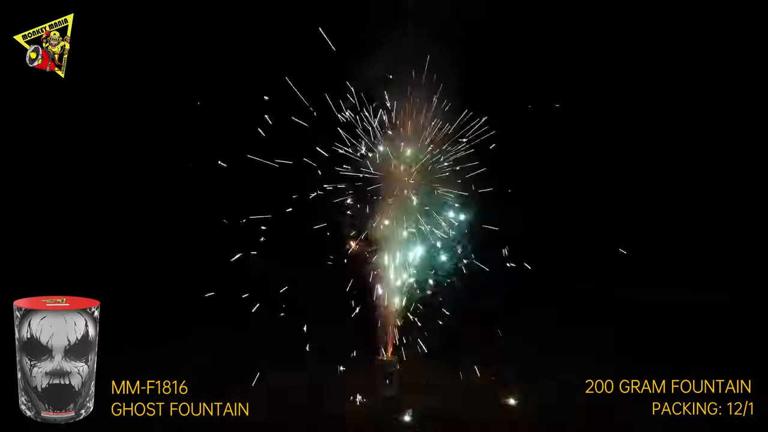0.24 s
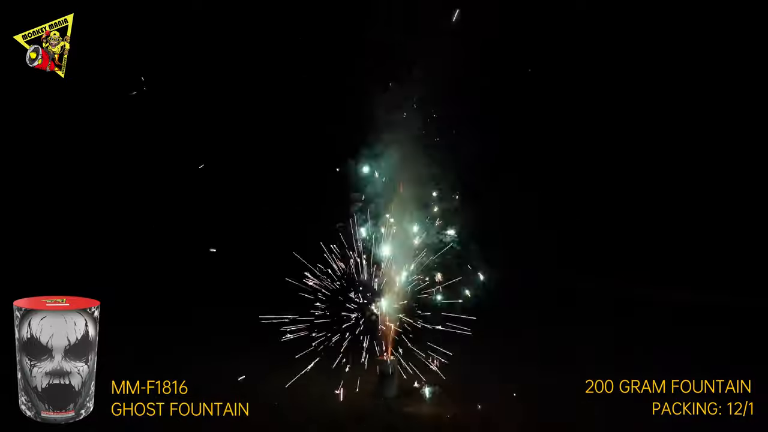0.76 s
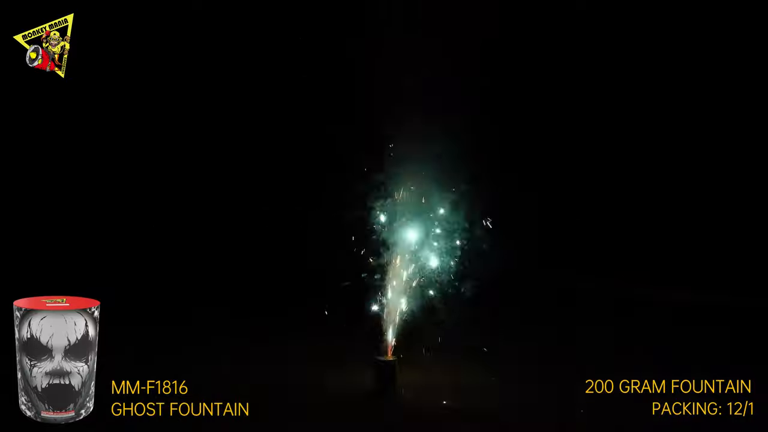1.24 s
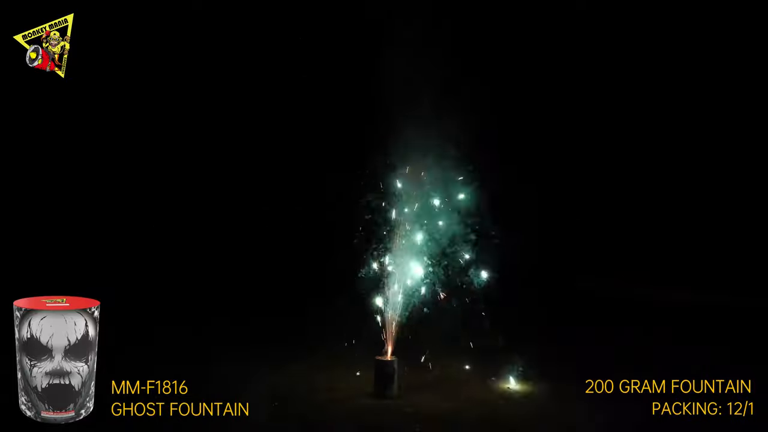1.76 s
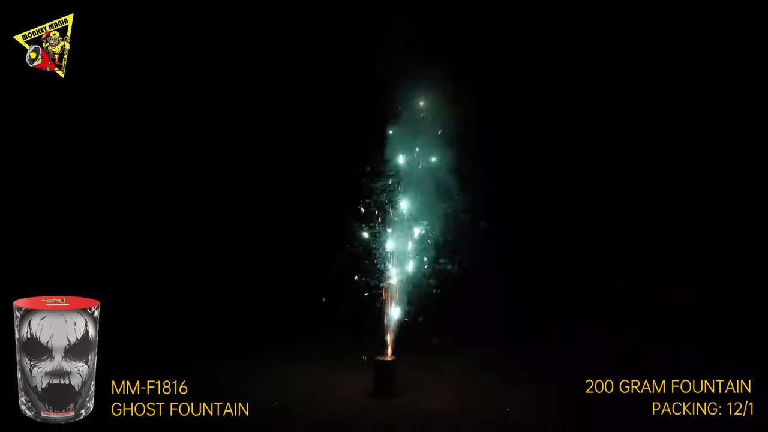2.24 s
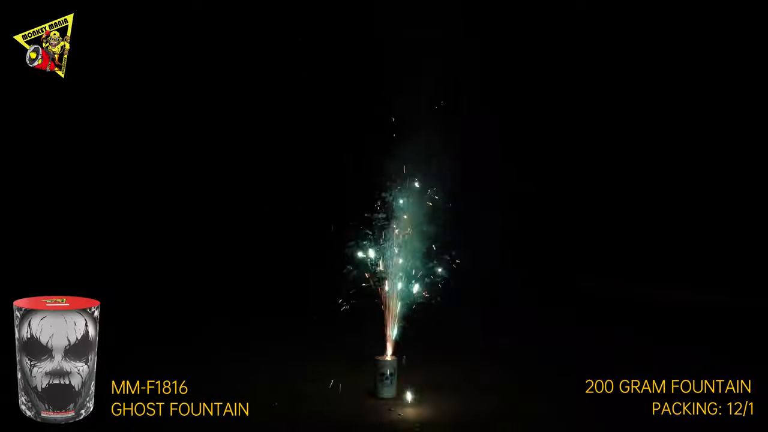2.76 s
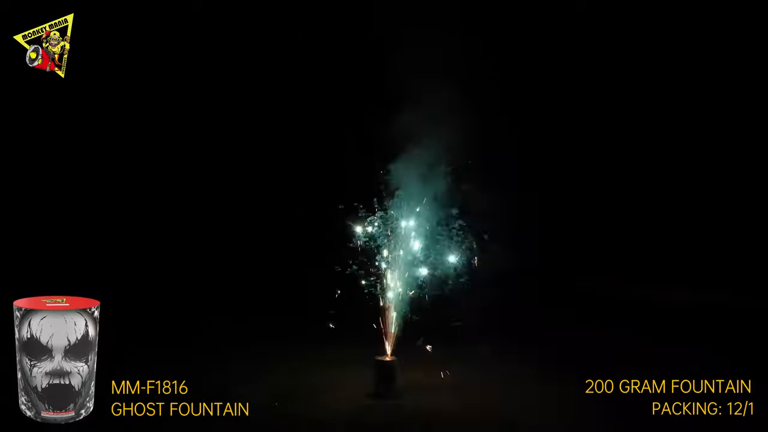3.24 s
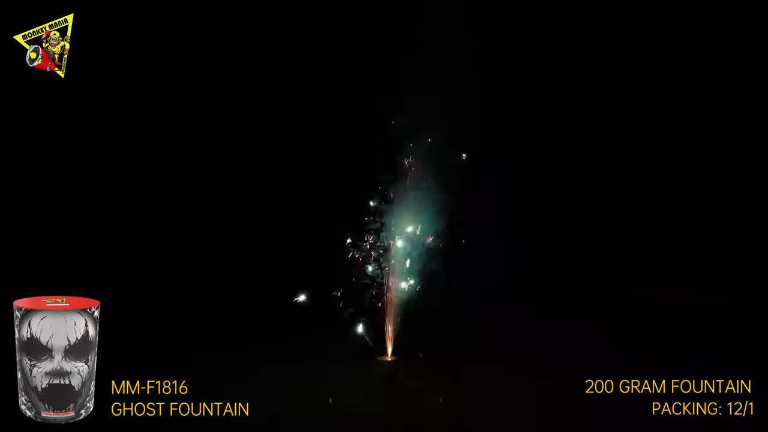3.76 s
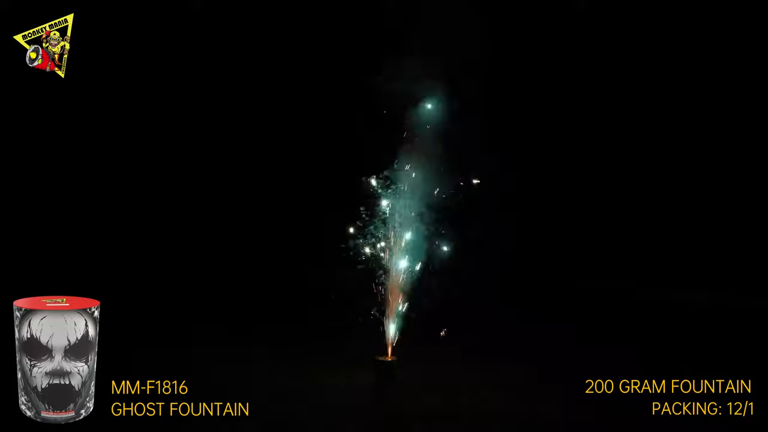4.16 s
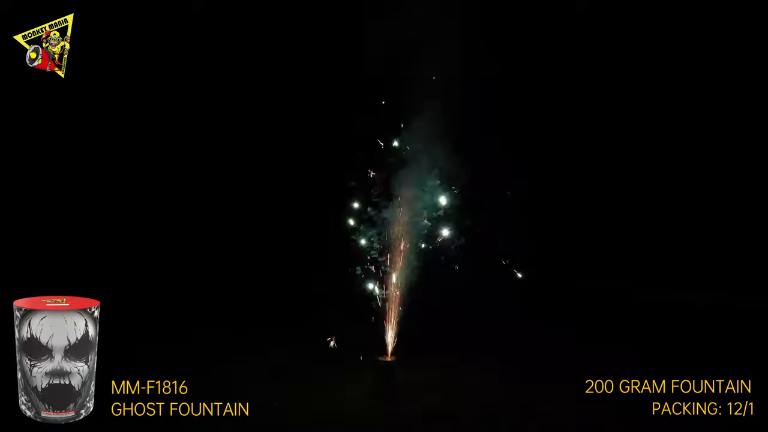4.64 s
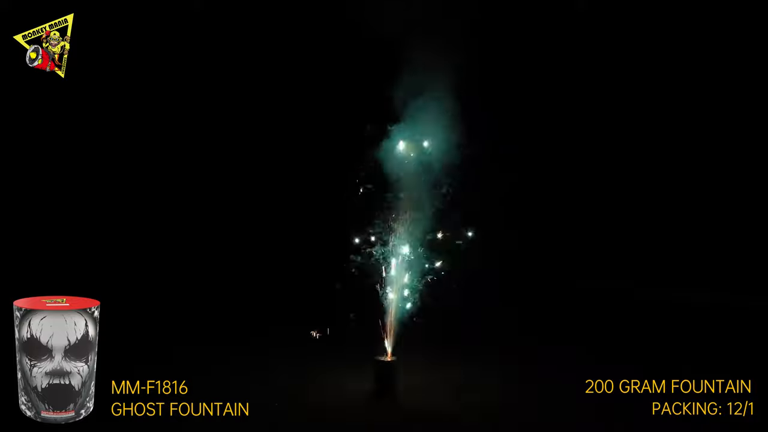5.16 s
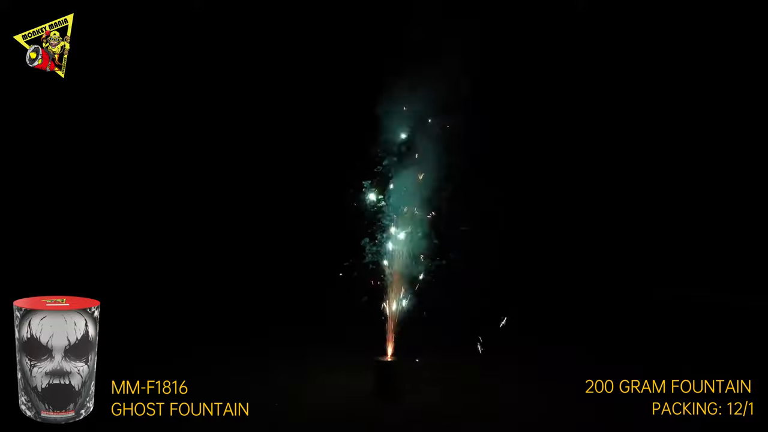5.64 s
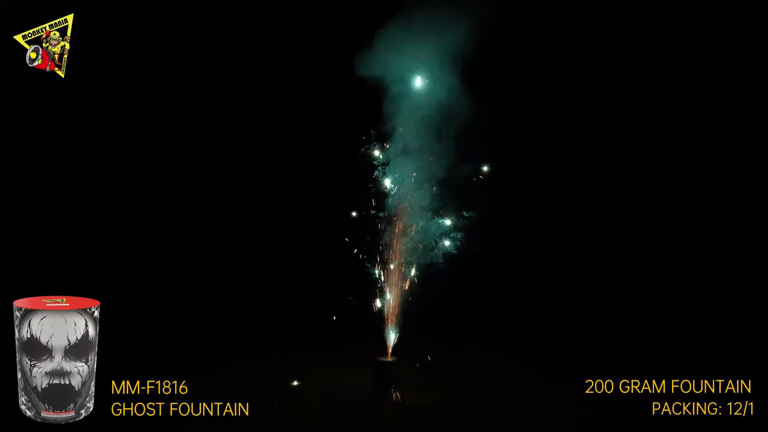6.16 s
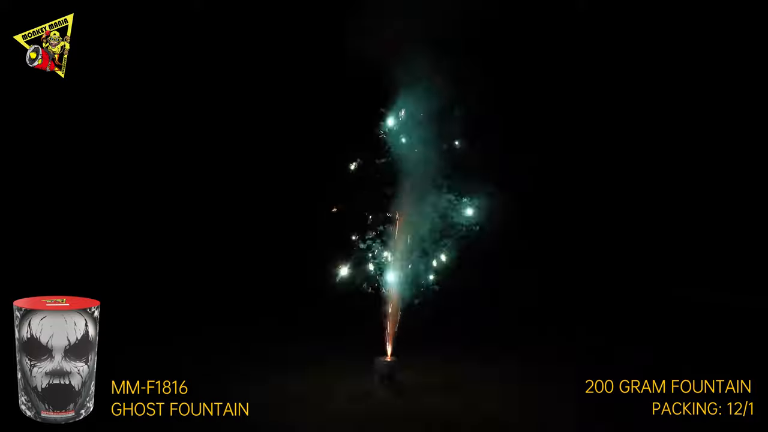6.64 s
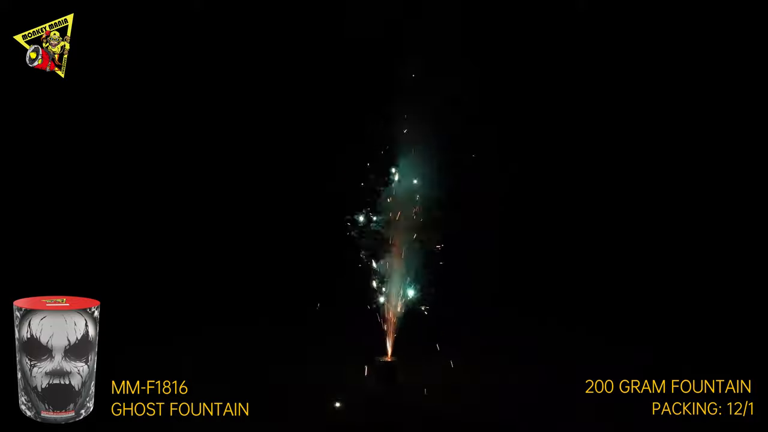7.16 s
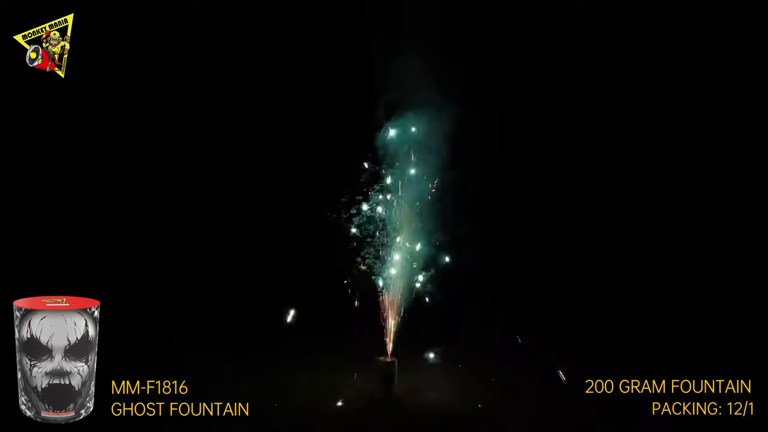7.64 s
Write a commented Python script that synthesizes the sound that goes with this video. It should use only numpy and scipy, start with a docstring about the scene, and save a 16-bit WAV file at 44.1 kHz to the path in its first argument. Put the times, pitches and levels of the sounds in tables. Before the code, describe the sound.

Rapid crackling and a few small pops from a ground firework give way to a swelling, rushing jet of sparks.

```python
"""Firework fountain at night

A fountain burns on open ground a few metres away, over the soft hiss of its flame. Crackling stars
burst in sharp snaps, each doubled by its bounce off the ground and trailed by a faint outdoor tail.
The nozzle pops five times, ringing its cardboard tube; then the next charge builds into a loud,
fluttering jet of turbulent gas and sparks."""
import sys
import numpy as np
from scipy import signal
from scipy.fft import rfft, irfft
from scipy.io import wavfile
from scipy.ndimage import uniform_filter1d, minimum_filter1d

SR = 44100
rng = np.random.default_rng(int(sys.argv[2]) if len(sys.argv) > 2 else 0)


def inscribe(sig):
    """Save sig as 16-bit PCM at rate SR to the path in sys.argv[1].

    A 1-D sig is mono; a 2-D sig holds one channel per row.
    Samples are clipped to [-1, 1] before scaling.
    """
    pcm = np.round(np.clip(np.atleast_2d(sig).T, -1, 1) * 32767)
    wavfile.write(sys.argv[1], SR, pcm.astype(np.int16))


N = 348390
T = np.arange(N) / SR
HZ = np.fft.rfftfreq(N, 1 / SR)

# Length of the outdoor tail. Each row: frequency in Hz, seconds to fade by 60 dB.
TAIL_DECAY = [(200, 1.5), (1000, 0.43), (3000, .6), (8000, 0.7), (15000, 0.5)]
# Tone of the outdoor tail. Each row: frequency in Hz, relative level in dB.
TAIL_EQ = [(100, 0), (700, -0.5), (2000, 0.5), (5000, 0.5), (10000, -8), (15000, 0)]
# Tone of the flame's quiet hiss. Each row: frequency in Hz, relative level in dB.
SIMMER_EQ = [(18, -76), (30, -46), (256, -7), (389, -14), (852, -7), (996, -12), (1590, 1), (2420, -3),
             (2830, -9), (11600, -8), (14300, -25), (15500, -40)]
# Pops inside the tube. Each row: start in seconds, relative level in dB.
POP_CUES = [(.7098, -17), (.758, -12), (0.913, -14), (.954, -9), (1.0085, -8.5)]
# The tube's ring. Each row: frequency in Hz, relative level in dB, seconds to fade by 60 dB.
TUBE_MODES = [(260, -26.5, 0.016), (1740, -8.5, 0.0061), (2250, -6.5, 0.0095), (3950, -11.5, 0.0065),
              (5900, -9, 0.0043), (8550, -13, 0.0034)]
# Bursting stars. Each row: start in seconds, relative level in dB, ground bounce delay in seconds.
STAR_CUES = [(0.0014, -3.5, 0.002), (0.0089, -12, 0.0018), (0.0146, 1, 0.0022), (0.0292, 2.5, 0.0028),
             (0.0446, 0, 0.0029), (0.0522, 0.5, 0.0028), (0.0815, 2.5, 0.0027), (0.0984, 0, 0.0024),
             (0.0998, -1, 0.0022), (0.1053, -3, 0.0025), (0.1126, 1.5, 0.002), (0.1209, 0, 0.0018),
             (0.1289, -1.0, 0.0024), (0.132, -0.5, 0.0027), (0.1377, -6, 0.002), (0.1406, 2.5, 0.0031),
             (0.1446, 2, 0.00226), (0.189, -13.0, 0.0015), (0.2056, 2, 0.0029), (0.2085, -4, 0.0025),
             (0.2106, 4, 0.0024), (0.2379, -6, 0.0014), (0.2475, 2, 0.0031), (0.2513, -1.0, 0.0025),
             (0.2668, 0, 0.0026), (0.3146, -5.5, 0.0016), (0.3187, 4, 0.0029), (0.4014, 4.5, 0.0023),
             (0.4176, 2, 0.0015), (0.45, 3, 0.0018), (0.4531, 4.5, 0.0025), (0.462, 0, 0.0013),
             (0.4663, -5, 0.0012), (0.484, -2, 0.0021), (0.4862, 2.5, 0.0018), (0.4962, 1.5, 0.0016),
             (0.5072, -8.0, 0.0015), (0.5093, -3, 0.0013), (0.5168, 2, 0.0014), (0.552, 1.5, 0.0031),
             (0.5852, 2, 0.0027), (0.5893, 2.5, 0.0013), (0.593, 1.5, 0.0019), (0.5937, 1.5, 0.0022),
             (0.6287, 1.5, 0.0022), (0.6302, 3.5, 0.0019), (0.6456, 0, 0.00063), (0.663, 1.5, 0.0011),
             (0.6636, 2, 0.00099), (0.7821, 4, 0.0011), (0.7858, -1, 0.00095)]
# Tone of a star's snap. Each row: frequency in Hz, relative level in dB.
SNAP_EQ = [(30, -40), (70, -34), (160, -13), (300, -9.5), (650, -3), (1400, 2), (2500, 0.5), (3800, -1),
           (5200, -1), (7200, -2.5), (9500, 0.5), (11500, -3.5), (13500, -13), (16000, -23)]
# Broad tone of the jet. Each row: frequency in Hz, relative level in dB.
JET_EQ = [(30, -27), (62, -41), (100, -20.5), (170, -3.5), (260, 0), (450, -5), (1100, -9), (3000, -12.5),
          (7000, -14), (10000, -9.5), (12500, -15.5), (14000, -20.5), (15600, -28.5)]
# Peaks and notches from tube and ground path. Each row: centre in Hz, width in Hz, gain in dB.
JET_RESONANCES = [(484, 61, -5), (636, 39, 0.6), (822, 23, -5.5), (1305, 81, 5.5), (1585, 163, 11.5),
                  (2113, 227, 14), (2537, 121, 7), (2887, 110, -4), (3510, 210, 7), (3928, 134, 3),
                  (4420, 69, 6), (4700, 44, 3), (5700, 234, 6.5), (6006, 113, 4.5), (6750, 130, 1.5),
                  (7930, 200, 2.5), (8600, 60, 0), (8880, 120, 3), (9270, 60, -1.5), (9900, 220, 1),
                  (12100, 180, 1), (13000, 160, 0.5)]
# Full thrust, swelling and sagging with the uneven burn. Each row: time in seconds, level in dB.
THRUST_FADER = [(2.5, -13.5), (2.98, -15.3), (3.36, -14), (3.42, -18.5), (3.8, -13.5), (4.34, -15.1),
                (4.58, -13.5), (5.02, -15), (5.28, -14), (5.38, -17.5), (5.96, -13), (6.14, -16.5),
                (6.36, -13.3), (6.5, -17.5), (6.6, -15), (6.92, -14.5), (6.96, -17.5), (7.02, -15),
                (7.52, -14), (7.88, -16)]
# The jet's low end. Each row: time in seconds, level against the thrust in dB.
RUMBLE_FADER = [(1.65, -13), (2.08, -9), (2.55, -11.5), (3.1, -8.5), (4.2, -12), (5.4, -9.5), (6.55, -11.5),
                (7.05, -8), (7.9, -11)]
# Bright spits of sparks from the nozzle. Each row: peak time in seconds, lift of the fizz in dB.
SPARK_SPITS = [(2.199, 5.5), (2.56, 2), (3.355, 2), (4.028, 3), (4.642, 2.5), (5.29, 2.5), (6.002, 2.5),
               (6.61, 3)]
# Low puffs of gas. Each row: peak time in seconds, lift of the rumble in dB.
GAS_PUFFS = [(1.304, 5.5), (2.08, 5), (3.063, 4.5), (3.75, 2.5), (4.665, 5), (6.94, 3.5)]
# Balance of jet and hiss at the microphone ports. Each row: frequency in Hz, left minus right in dB.
BURN_PAN = [(120, 0.0), (260, 1), (480, -2.4), (720, -1.5), (1100, -1.5), (1800, -0.4), (2900, 0.5),
            (4000, 0.1)]
# Stereo scatter of jet and hiss. Each row: frequency in Hz, relative side level in dB.
BURN_WIDTH = [(120, -70), (260, -46), (480, -21), (720, -21), (1100, -26), (1800, -19.5), (2900, -39),
              (4000, -35), (8000, -31), (13000, -52)]


def gain_of(db):
    """Decibels to amplitude."""
    return 10 ** (np.asarray(db) / 20)


def unit_rms(x):
    """Scales to rms 1."""
    return x / np.sqrt(np.mean(x ** 2) + 1e-20)


def curve_at(points, hz):
    """Reads a table on a log-frequency axis."""
    f, value = np.transpose(points)
    return np.interp(np.log(hz + 1), np.log(f + 1), value)


def add(mix, start_s, sound):
    """Drops a sound into the mix."""
    part = mix[max(round(start_s * SR), 0):][:len(sound)]
    part += sound[:len(part)]


def tightest_click(db):
    """The shortest click that has the given dB spectrum, with energy 1."""
    log_gain = np.log(gain_of(np.r_[db, db[-2:0:-1]]))
    click = np.fft.ifft(np.exp(np.conj(signal.hilbert(log_gain)))).real
    return click / np.linalg.norm(click)


def flutter(slow_hz, fast_hz):
    """Random wavering between two rates, rms 1."""
    shape = HZ / np.hypot(HZ, slow_hz) / (1 + (HZ / fast_hz) ** 2)
    return unit_rms(irfft(rfft(rng.standard_normal(N)) * shape, N))


def swells(cues, width_s):
    """A brief bell-shaped lift in dB at each cue."""
    return sum(db * np.exp(-.5 * ((T - peak_s) / width_s) ** 2) for peak_s, db in cues)


def scattered_spectrum(x, decay_s):
    """The spectrum of a sound smeared by a short random scatter."""
    scatter = rng.standard_normal(N) * T * np.exp(-T / decay_s)
    return rfft(x) * rfft(scatter / np.linalg.norm(scatter))


def outdoor_tail(x, echoes_per_s=4000, near_db=3, near_s=0.016,
                 slap_db=3, slap_s=0.067, slap_width_s=0.0027):
    """Scattered echoes: a quick cluster from nearby, a soft slap from farther off, a fading wash."""
    echoes = rng.standard_normal(SR) * (rng.random(SR) < echoes_per_s / SR)
    hz, t, wash = signal.stft(echoes, SR, nperseg=256)
    fade_db = 60 * t / curve_at(TAIL_DECAY, hz)[:, None]
    wash = wash * gain_of(curve_at(TAIL_EQ, hz)[:, None] - fade_db)
    near = gain_of(near_db) * np.exp(-t / near_s)
    slap = gain_of(slap_db) * np.exp(-((t - slap_s) / slap_width_s) ** 2)
    tail = signal.istft(wash * (1 + near + slap), SR, nperseg=256)[1]
    return signal.fftconvolve(x, tail / np.linalg.norm(tail))[:N]


def flame_simmer(level_db=-55, flutter_db=2.5):
    """The flame's soft, wavering hiss, a bed under everything."""
    hiss = irfft(rfft(rng.standard_normal(N)) * gain_of(curve_at(SIMMER_EQ, HZ)), N)
    return unit_rms(hiss) * gain_of(level_db + flutter_db * flutter(5, 40))


def nozzle_pops(tick_db=-11, band_hz=(140, 10000), echo_s=0.0072, echo_db=-17):
    """A small blast in the nozzle rings the cardboard tube's air column; a weak echo follows."""
    t, out = np.arange(2048) / SR, np.zeros(N)
    # neighbouring modes swing in opposite directions at the mouth
    ring = sum((-1) ** k * gain_of(db - 60 * t / t60) * np.cos(2 * np.pi * hz * t)
               for k, (hz, db, t60) in enumerate(TUBE_MODES))
    ring[0] += gain_of(tick_db)
    ring = signal.sosfilt(signal.butter(2, band_hz, "band", fs=SR, output="sos"), ring)
    for start_s, db in POP_CUES:
        add(out, start_s, gain_of(db) * ring)
        add(out, start_s + echo_s, gain_of(db + echo_db) * ring)
    return out


def housing_ring(x, centre_hz=9300, width_hz=2800):
    """The microphone housing delays the treble (two all-passes), so a brief ring trails each spike."""
    radius = np.exp(-np.pi * width_hz / SR)
    poles = [1, -2 * radius * np.cos(2 * np.pi * centre_hz / SR), radius ** 2]
    return signal.lfilter(poles[::-1], poles, signal.lfilter(poles[::-1], poles, x))


def crackling_stars(level_db=3, bounce_db=-9, tilt_spread=2.05, grass_db=-10, grass_s=0.003):
    """Each star gives a shock spike, a short scatter off the grass and a ground bounce."""
    hz, t = np.fft.rfftfreq(1024, 1 / SR), np.arange(1024) / SR
    out = np.zeros(N)
    for start_s, db, bounce_s in STAR_CUES:
        tilt_db = tilt_spread * rng.standard_normal() * np.log((hz + 500) / 3000)  # brighter or duller
        snap = tightest_click(curve_at(SNAP_EQ, hz) + tilt_db)
        scatter = rng.standard_normal(len(t)) * np.exp(-t / grass_s)
        grass = signal.fftconvolve(snap, scatter)[:len(t)]
        burst = gain_of(db + level_db) * (snap + gain_of(grass_db) * grass / np.linalg.norm(grass))
        add(out, start_s, burst)
        add(out, start_s + bounce_s, gain_of(bounce_db) * burst)
    return out


def spark_jet(catch_s=1.076, build_s=1.473, build_db=39.5, build_ease=1.26,
              sparks_per_s=700, spark_share=0.22, rumble_below_hz=460, fizz_above_hz=2850,
              roar_trim_db=-0.1, fizz_trim_db=-2.2):
    """Turbulent gas and tiny spark snaps, coloured by the tube; thrust drives rumble, roar and fizz."""
    unlit = np.clip(1 - (T - catch_s) / build_s, 0, 1)
    thrust_db = np.interp(T, *np.transpose(THRUST_FADER)) - build_db * unlit ** build_ease
    fade_in = gain_of(-60 * np.maximum(catch_s - T, 0))  # the charge catches gradually

    sparks = (rng.random(N) < sparks_per_s / SR) * rng.standard_normal(N)
    resonance_db = sum(db * np.exp(-.5 * ((HZ - hz) / width) ** 2) for hz, width, db in JET_RESONANCES)
    flow = rfft(rng.standard_normal(N) + spark_share * unit_rms(sparks))
    flow *= gain_of(curve_at(JET_EQ, HZ) + resonance_db)
    lows = 1 / (1 + (HZ / rumble_below_hz) ** 8)
    highs = 1 - 1 / (1 + (HZ / fizz_above_hz) ** 16)

    spits_db, puffs_db = swells(SPARK_SPITS, width_s=0.0038), swells(GAS_PUFFS, width_s=0.017)
    # one flutter of the flame shakes all three bands together; eddies stir only the rumble
    flame, eddies = flutter(2.6, 31), flutter(3.2, 24)
    rumble_db = np.interp(T, *np.transpose(RUMBLE_FADER)) + puffs_db + 1.5 * (eddies + 0.38 * flame)
    roar_db = roar_trim_db + 0.53 * spits_db + 0.9 * flame
    fizz_db = fizz_trim_db + spits_db + 0.79 * flame
    layers = [(lows, rumble_db), (1 - lows - highs, roar_db), (highs, fizz_db)]
    return fade_in * sum(unit_rms(irfft(flow * band, N)) * gain_of(thrust_db + db)
                         for band, db in layers)


def scene(tail_db=-18, burn_side_trim_db=-4, burst_side_db=-19.5):
    """The jet sits straight ahead, nearly mono; the snaps and pops spread a little wider."""
    bursts = housing_ring(crackling_stars()) + nozzle_pops()
    bursts += gain_of(tail_db) * outdoor_tail(bursts)
    burn = spark_jet() + flame_simmer()
    burn_width = gain_of(curve_at(BURN_WIDTH, HZ) + burn_side_trim_db)
    side = scattered_spectrum(burn, decay_s=0.03) * burn_width
    side += scattered_spectrum(bursts, decay_s=0.00049) * gain_of(burst_side_db)
    pan = gain_of(np.outer([.5, -.5], curve_at(BURN_PAN, HZ)))
    return irfft(rfft(bursts) + rfft(burn) * pan + np.outer([1, -1], side), N)


def record(dry, ceiling=0.94, low_cut_hz=85, high_cut_hz=15900):
    """A fast limiter ducks the loudest spikes; then a wind filter and a steep high cut."""
    allowed_gain = ceiling / np.maximum(abs(dry).max(0), ceiling)
    limited = dry * uniform_filter1d(minimum_filter1d(allowed_gain, size=9), size=7)
    limited = signal.sosfilt(signal.butter(2, low_cut_hz, "high", fs=SR, output="sos"), limited)
    high_cut = signal.firwin(511, high_cut_hz, window=("kaiser", 9), fs=SR)
    return signal.oaconvolve(limited, high_cut[None], "same")


dry = scene()
out = record(dry)
inscribe(out)
```